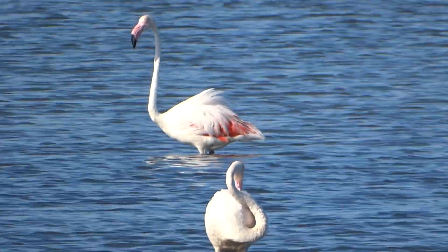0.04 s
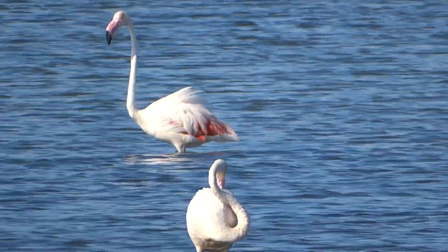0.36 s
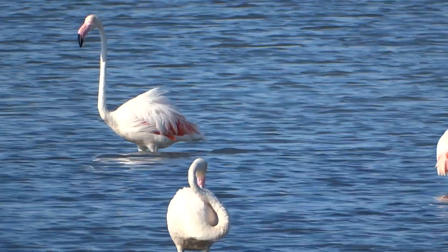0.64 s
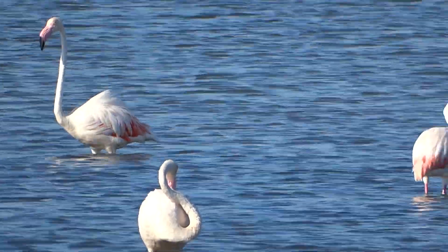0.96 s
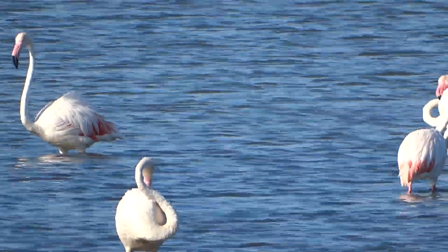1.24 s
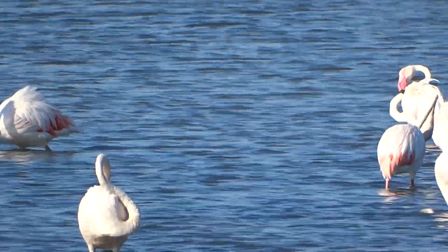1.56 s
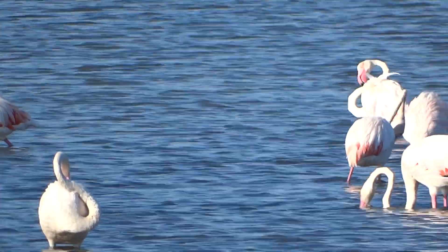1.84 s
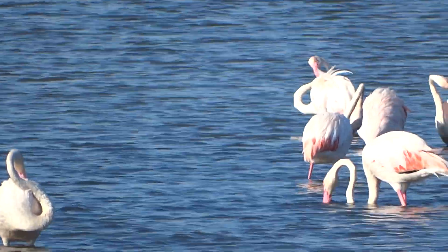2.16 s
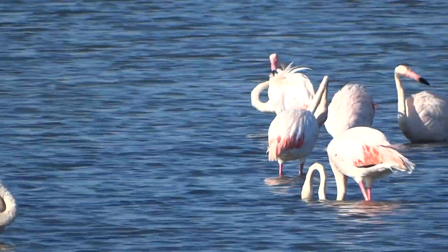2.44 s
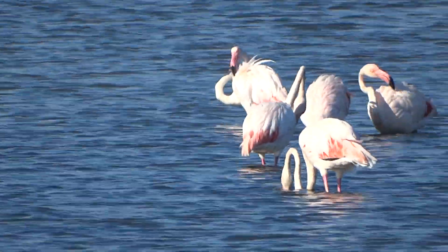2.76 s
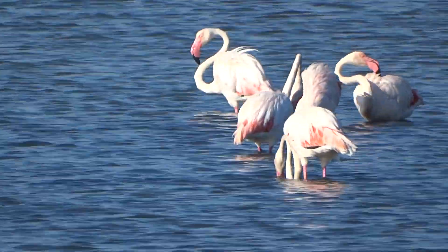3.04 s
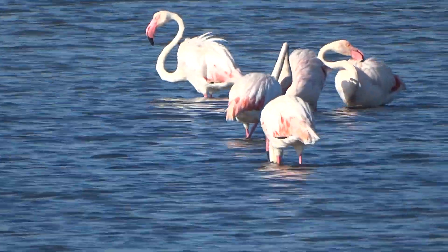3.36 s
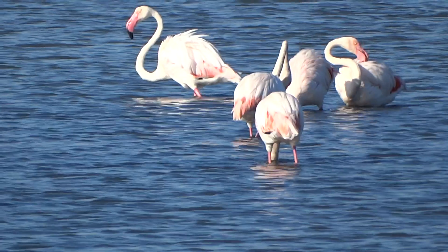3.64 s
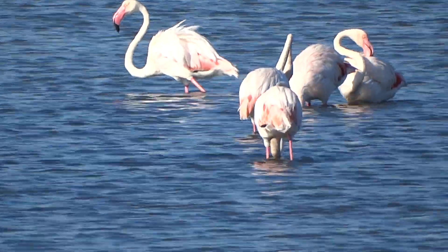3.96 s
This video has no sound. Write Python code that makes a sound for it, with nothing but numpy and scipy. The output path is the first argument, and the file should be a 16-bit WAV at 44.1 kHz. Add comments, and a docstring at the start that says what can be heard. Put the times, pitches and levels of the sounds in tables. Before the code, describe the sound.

Flamingos gabble from the start, a little to the left, in short rattling croaks that vary between nasal, dull and raspy and continue for all four seconds. Brief hoarse honks break out at about 0.6, 1.3 and 2.2 seconds, then two softer ones near 3.3 and 3.7 seconds. The calls carry a slight outdoor echo. More birds murmur far behind, and light wind rumbles faintly throughout.

```python
"""Flamingos gabble in a shallow lagoon for 4 s, a little to the left.
From the start, croaks: rattles of 60-110 short bursts a second ringing in a bird's throat.
Near 0.6, 1.3, 2.2, 3.3 and 3.7 s the voice holds on and breaks into a hoarse, sagging honk.
Throughout, more birds murmur far behind, calls echo off ripples and shore, and wind rumbles softly."""
import sys
import numpy as np
from scipy import signal
from scipy.fft import rfft, irfft
from scipy.io import wavfile
from scipy.ndimage import uniform_filter1d

SR = 44100
rng = np.random.default_rng(int(sys.argv[2]) if len(sys.argv) > 2 else 0)


def inscribe(sig):
    """Save sig as 16-bit PCM at rate SR to the path in sys.argv[1].

    A 1-D sig is mono; a 2-D sig holds one channel per row.
    Samples are clipped to [-1, 1] before scaling.
    """
    pcm = np.round(np.clip(np.atleast_2d(sig).T, -1, 1) * 32767)
    wavfile.write(sys.argv[1], SR, pcm.astype(np.int16))


N = 176400
BASS_HZ, TREBLE_HZ = 1426, 2900  # where a call's bass ends and its treble begins


def croak(voice, start_s, length_s, rate_hz, level_db, swell_db, bass_db, treble_db):
    """A rattle of bursts; the throat opens and brightens with effort. Returns start in s, sound."""
    margin_s, jitter_s, shimmer_db, arch_db = .05, .0004, 1, 3
    open_per_db, stretch_spread, treble_per_db = .005, .018, .57
    sound = np.zeros(round((length_s + 2 * margin_s) * SR))
    for when_s in np.arange(0, length_s, 1 / rate_hz):
        late, loud, shift = rng.standard_normal(3)
        from_middle = when_s / length_s - .5
        effort_db = swell_db * from_middle - arch_db * (2 * from_middle) ** 2
        stretch = 1 + open_per_db * effort_db + stretch_spread * shift
        ring = throat(burst(rate_hz), voice, stretch, bass_db, treble_db + treble_per_db * effort_db)
        centre_s = margin_s + when_s + jitter_s * late
        add(sound, centre_s - len(ring) / SR / 2, amp(effort_db + shimmer_db * loud) * ring)
    gain = amp(level_db) * np.sqrt((length_s + margin_s) / (length_s + 2 * margin_s))
    return start_s - margin_s, gain * unit_rms(sound)


def burst(rate_hz, size=2048):
    """A few membrane beats and a puff of turbulence that swell and die together."""
    turbulence, flattening = .77, .63
    t = (np.arange(size) - size / 2) / SR
    cycle_s = .001359 * (1 + .05 * rng.standard_normal())
    turns = np.floor(t / cycle_s)
    beats = unit_rms(turns > np.roll(turns, 1))
    half_length_s = .0019 * (rate_hz / 78.8) ** 1.7  # faster rattles have fuller bursts
    envelope = np.exp(-(t / half_length_s) ** 2)
    spectrum = rfft(envelope * (beats + turbulence * rng.standard_normal(size)))
    # a flatter burst excites all resonances more evenly
    return unit_rms(irfft(spectrum / (abs(spectrum) + np.median(abs(spectrum))) ** flattening))


def throat(drive, voice, stretch, bass_db, treble_db):
    """Rings the drive in a throat whose resonances are shifted by the factor stretch."""
    # Throat resonances by voice. Each point: frequency in Hz, gain in dB.
    resonances = { "nasal": [(380, -48), (880, -7), (1200, -16.5), (1750, -17), (2130, 3), (2650, -21.5),
                  (3200, -12), (4050, -24.5), (5500, -17.5), (6020, -41.5), (6950, -14.5), (7700, -38.5),
                  (9500, -42.5), (11500, -74.5)], "rasp": [(400, -42), (980, 3.5), (1700, -13), (2280, 2),
                  (2750, -12.5), (3750, -8), (4150, -30.5), (5250, -7), (6120, -33), (7200, -14.5),
                  (8200, -35), (9600, -39.5), (12000, -70)], "dull": [(380, -41.5), (930, 2.5),
                  (1550, -8.5), (1900, -3), (2450, 0), (3000, -14), (4100, -33), (7200, -33),
                  (12000, -65.5)], "pinched": [(400, -46), (930, -6), (1650, -19), (2200, 2), (2700, -22.5),
                  (3300, -19), (6100, -46), (9500, -42.5), (11500, -69.5)], "wide": [(380, -38), (900, 2.5),
                  (1750, -14.5), (2250, -4.5), (3300, -4), (4200, -29), (5700, -13.5), (7400, -9),
                  (8200, -22), (13000, -56)]}
    bite_db, ring_share = 2.3, .4  # share 0 rings evenly around a burst, 1 only after it
    hz = abs(np.fft.fftfreq(len(drive), 1 / SR))
    db = read_curve(resonances[voice], hz / stretch) + bass_db * (1 - above(hz, BASS_HZ))
    db += (treble_db + bite_db) * above(hz, TREBLE_HZ)
    lag_rad = signal.hilbert(np.log(amp(db))).imag
    return np.fft.ifft(np.fft.fft(drive) * amp(db) * np.exp(-1j * ring_share * lag_rad)).real


def honk(start_s, length_s, top_hz, level_db, treble_db):
    """The membrane swings freely: a hoarse note that arches, clears and sags. Returns start in s, sound."""
    # Envelope of the harmonics. Each point: frequency in Hz, relative level in dB.
    timbre = [(700, 0.5), (1450, -1), (2170, 3.5), (2900, -17.5), (4400, -29), (5150, -12), (5950, -28),
              (7300, -20.5), (10500, -43.5)]
    top_at, sag, edge_s, clearing_db = .299, .1925, .018, -11
    full_db, dull_hz = -35.5, 1800
    t = np.arange(0, length_s, 1 / SR)
    progress = t / length_s
    drift, tremor, turbulence = rng.standard_normal((3, SR))[:, :len(t)]
    unsteady = .29 + abs(2 * progress - 1)  # most at the ends
    wobble, shimmer = .005 * unsteady * smooth(drift), .2 * unsteady * smooth(tremor)
    pitch_hz = top_hz * (1 - sag * (progress - top_at) ** 2 + wobble)
    phase = 2 * np.pi * np.cumsum(pitch_hz) / SR
    orders = np.arange(1, 14)[:, None]
    partials_hz = orders * pitch_hz
    db = read_curve(timbre, partials_hz) + treble_db * above(partials_hz, TREBLE_HZ)
    db += (level_db - full_db) * above(partials_hz, dull_hz)  # softer honks lose upper harmonics
    tone = unit_rms((amp(db) * np.sin(orders * phase + orders ** 2)).sum(0))
    rasp = unit_rms(throat(turbulence * (1 + np.cos(phase)), "rasp", 1, 0, treble_db))
    note = (1 + shimmer) * tone + .5 * amp(clearing_db * progress) * rasp
    fade = np.sin(np.pi / 2 * np.minimum(np.minimum(t, length_s - t) / edge_s, 1))
    return start_s, amp(level_db) * fade * unit_rms(note)


def far_flock(calls=70, level_db=-60):
    """Distant birds croak dully at random."""
    murmur = np.zeros(N)
    for when, size, pace, loud in rng.random((calls, 4)):
        add(murmur, *croak("dull", when * N / SR, length_s=.08 + .1 * size, rate_hz=68 + 30 * pace,
                           level_db=6 * loud, swell_db=0, bass_db=9, treble_db=-14))
    return amp(level_db) * unit_rms(murmur)


def lagoon(birds):
    """Adds quick scatter off the ripples, mostly lower tones, then a thin stereo tail from the shore."""
    # Decay of the shore's echo. Each point: frequency in Hz, time to fall 60 dB in seconds.
    shore_t60 = [(900, .42), (5000, .14)]
    scatter_decay_s, scatter_hz, shore_db = .008, 2600, -16.5
    t = np.arange(SR // 2) / SR
    ripples, mid, side = rng.standard_normal((3, len(t)))
    scatter = ripples * (t > .003) * np.exp(-t / scatter_decay_s)
    scatter *= amp(-4) / np.linalg.norm(scatter)
    scatter = signal.lfilter(*signal.butter(1, scatter_hz, fs=SR), scatter)
    shore = np.array([mid + .33 * side, mid - .3 * side]) * (t > .012)
    hz, frames_s, spectra = signal.stft(shore, SR, nperseg=256)
    decay = amp(-60 * frames_s / read_curve(shore_t60, hz)[:, None])
    tail = signal.istft(spectra * decay, SR, nperseg=256)[1][:, :len(t)]
    echoes = scatter + amp(shore_db) * tail / np.linalg.norm(tail[0])
    return birds + signal.fftconvolve(birds[None], echoes, axes=1)[:, :N]


def wind(rumble_db=-62, air_db=-63):
    """Low rumble, almost the same in both ears, and a faint wash of air and ripples."""
    # Spectra of rumble and wash. Each point: frequency in Hz, relative level in dB.
    rumble_spectrum = [(20, -7.5), (80, 1), (180, -3.5), (310, -18.5)]
    air_spectrum = [(200, -6), (900, 4), (6000, -15), (15000, -35)]
    rumble = stereo_noise(rumble_spectrum, roof_hz=500, width=.07)
    air = stereo_noise(air_spectrum, roof_hz=SR / 2, width=.41)
    return amp(rumble_db) * rumble + amp(air_db) * air


def stereo_noise(points, roof_hz, width):
    """Noise with a given spectrum, falling away above roof_hz."""
    hz = np.fft.rfftfreq(N, 1 / SR)
    gain = amp(read_curve(points, hz)) * (1 - above(hz, roof_hz))
    mid, side = unit_rms(irfft(rfft(rng.standard_normal((2, N))) * gain, N))
    return np.array([mid + width * side, mid - width * side])


def amp(db):
    """Decibels to gain."""
    return 10 ** (np.asarray(db) / 20)


def unit_rms(x):
    """Scales to rms 1."""
    return x / np.sqrt(np.mean(x ** 2) + 1e-20)


def smooth(noise):
    """Averages twice over 2 ms; rms 1."""
    return unit_rms(uniform_filter1d(uniform_filter1d(noise, size=90), size=90))


def read_curve(points, hz):
    """Interpolates on a log-frequency axis."""
    points_hz, values = np.transpose(points)
    return np.interp(np.log(hz + 1), np.log(points_hz + 1), values)


def above(hz, edge_hz):
    """Smooth step from 0 to 1 at edge_hz."""
    return 1 - 1 / (1 + (hz / edge_hz) ** 10)


def add(mix, start_s, sound):
    """Mixes a sound in at start_s."""
    at = round(start_s * SR)
    part = mix[max(at, 0):][:len(sound) + min(at, 0)]
    part += sound[max(-at, 0):][:len(part)]


def scene():
    """The flock, a little to the left, on open water in light wind."""
    # Near croaks. Each row: voice, start and length in seconds, burst rate in Hz, level in dB,
    # swell from start to end in dB, bass in dB, treble in dB.
    croaks = [ ("nasal", .020, .084, 90, -33.5, 5.1, 0, -2.2), ("dull", .120, .105, 77, -50, 0, -2.4, 1.6),
              ("nasal", .250, 0.048, 89, -44.5, 4, 2, -5.5),
              ("dull", .310, .150, 74.5, -46.5, -2, -2.3, -2),
              ("pinched", .476, 0.092, 98, -49.5, 0, 3.3, -8),
              ("nasal", .579, .135, 83, -44.5, -8, 5.6, -11), ("nasal", .833, .080, 73, -44, 5.6, -3.5, -5),
              ("nasal", .924, 0.037, 86, -38, 4, -1, 0), ("nasal", 0.96, .065, 68.5, -44.5, 6, 1, -1.7),
              ("nasal", 1.046, .044, 88, -38.5, 0, -0.83, 1.8), ("rasp", 1.226, .080, 90, -45, 10.2, 1, 0),
              ("nasal", 1.357, .058, 95, -43, -8, 7.2, -9), ("dull", 1.458, .072, 95, -52, 0, 0, 2.2),
              ("rasp", 1.584, 0.092, 97, -49, 3.1, 7.2, -1), ("pinched", 1.698, .078, 110, -37, 4, 2, 0),
              ("nasal", 1.811, .046, 85, -37.5, 6, 0, -7), ("dull", 1.866, .050, 92, -41.5, -5, -7.5, 5.3),
              ("rasp", 1.944, 0.084, 69, -42, 3, 2.2, -0.88),
              ("nasal", 2.182, .129, 80, -45, 7.9, 8.5, -6.5),
              ("pinched", 2.318, .110, 96, -42.5, 0, 7.1, -4.5),
              ("rasp", 2.391, 0.067, 97, -51.5, -4, 6, 5.2), ("rasp", 2.515, 0.034, 60, -56.5, -5, 3, 3.5),
              ("dull", 2.577, .145, 90, -49, 5.9, -0.85, -9.5),
              ("dull", 2.735, 0.082, 104, -42.5, 0, -3, 0), ("rasp", 2.812, .084, 65, -47.5, -4, -7, -2.3),
              ("rasp", 2.920, .051, 66, -46.5, 2, -1, -1.1),
              ("rasp", 2.982, 0.035, 90, -44.5, -3.5, -3.5, 4.3),
              ("dull", 3.055, 0.18, 100, -47, 0, 10, -1.5), ("rasp", 3.232, .095, 90, -46.5, -1, 9, 1),
              ("rasp", 3.333, 0.067, 92, -51, -3.5, 10.4, 2.9),
              ("rasp", 3.480, 0.124, 88, -43, 3.1, 8.2, -5), ("wide", 3.613, 0.087, 99, -39.5, 5, 2, -4),
              ("rasp", 3.835, 0.079, 70, -48, 7, 5, 5.4), ("rasp", 3.945, .054, 88, -44, 7.3, 11, 2)]
    # Honks. Each row: start and length in seconds, top pitch in Hz, level in dB, treble in dB.
    honks = [(.604, 0.077, 751, -36.5, -11), (1.261, .102, 748.5, -36.5, 0.5),
             (2.207, 0.11, 734, -38.5, 3.5), (3.346, .058, 745, -44.5, -10), (3.687, .064, 715, -45.5, -9)]
    # The flock's lean to the left. Each point: frequency in Hz, left minus right in dB.
    lean = [(700, 0.5), (1200, 4.5), (2300, 1.07)]
    birds = far_flock()
    for row in croaks:
        add(birds, *croak(*row))
    for row in honks:
        add(birds, *honk(*row))
    lean_db = read_curve(lean, np.fft.rfftfreq(N, 1 / SR))
    pan = amp([lean_db / 2, -lean_db / 2])
    return irfft(rfft(lagoon(birds)) * pan, N) + wind()


def record(dry, edge_hz=15700):
    """Steep low-pass band limit."""
    lowpass = signal.firwin(511, edge_hz, window=("kaiser", 9), fs=SR)
    return signal.oaconvolve(dry, lowpass[None], "same")


dry = scene()
out = record(dry)
inscribe(out)
```